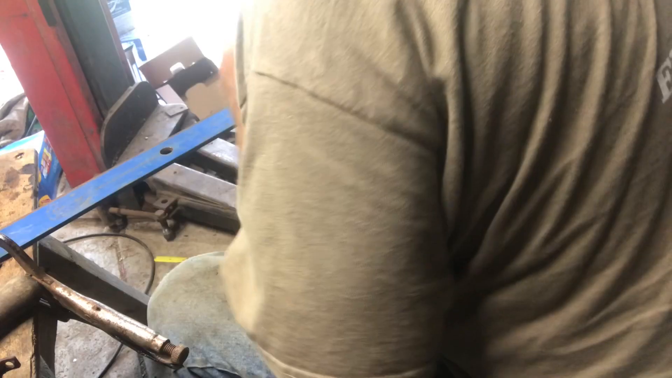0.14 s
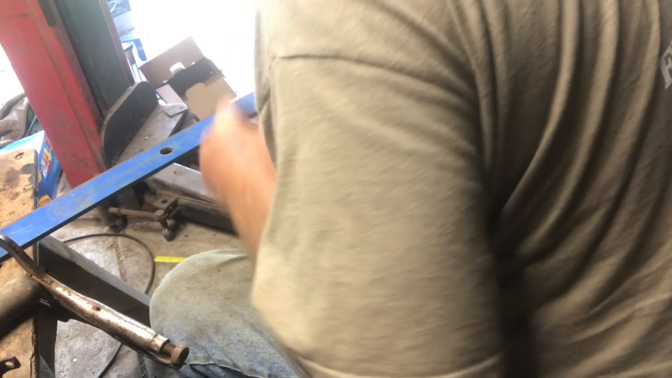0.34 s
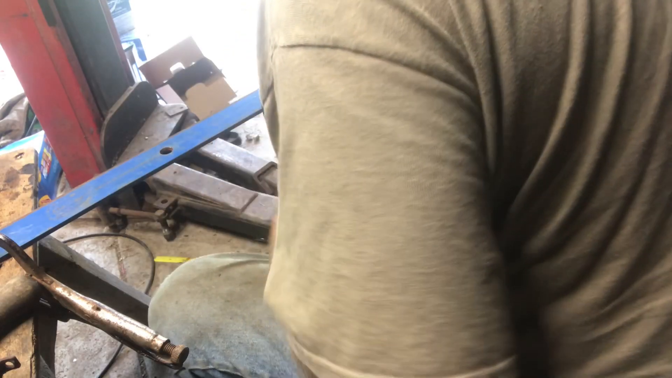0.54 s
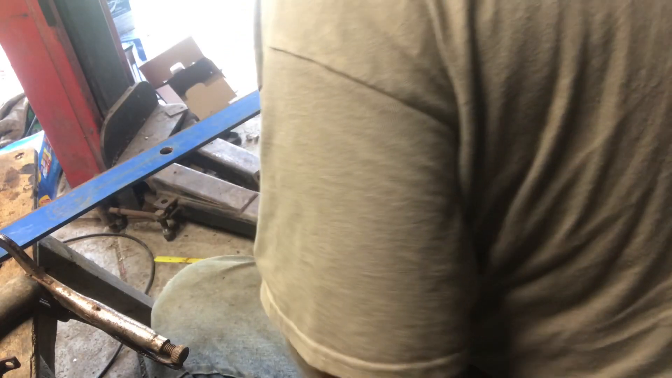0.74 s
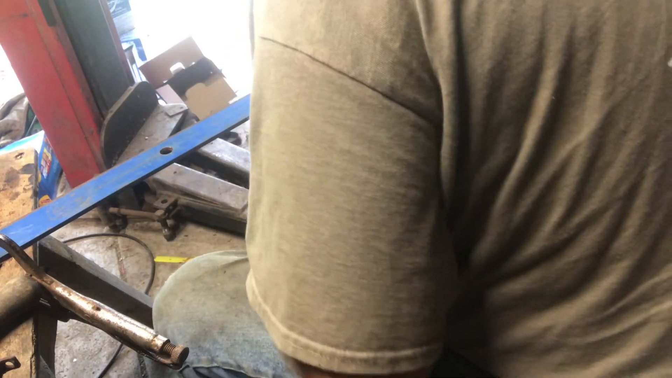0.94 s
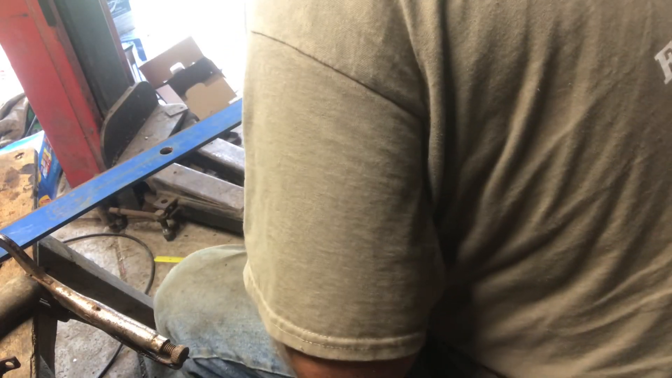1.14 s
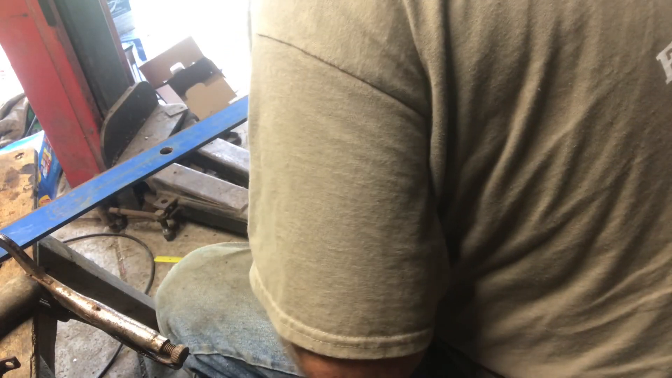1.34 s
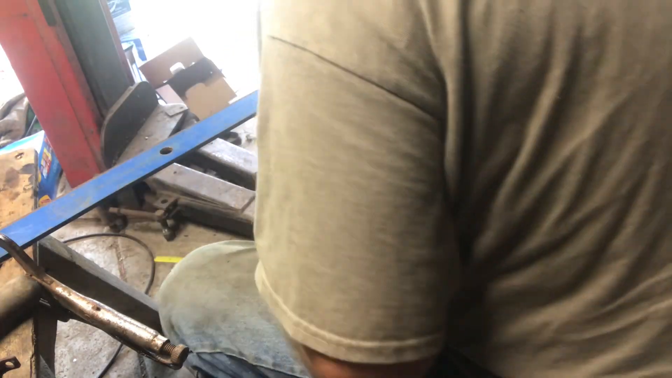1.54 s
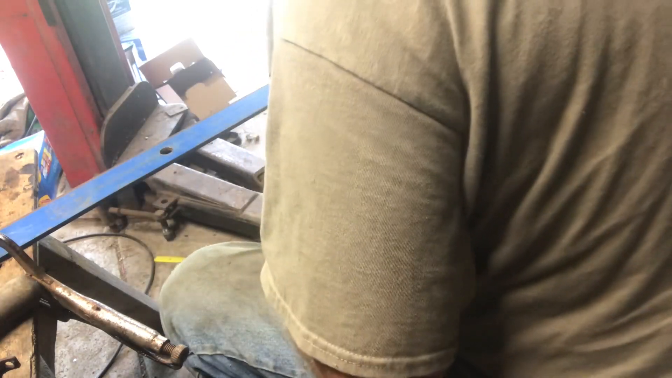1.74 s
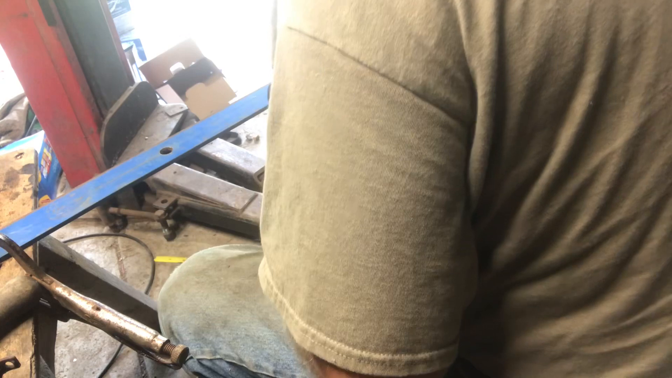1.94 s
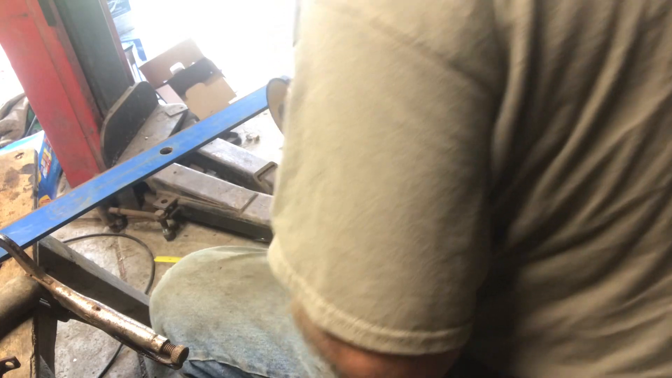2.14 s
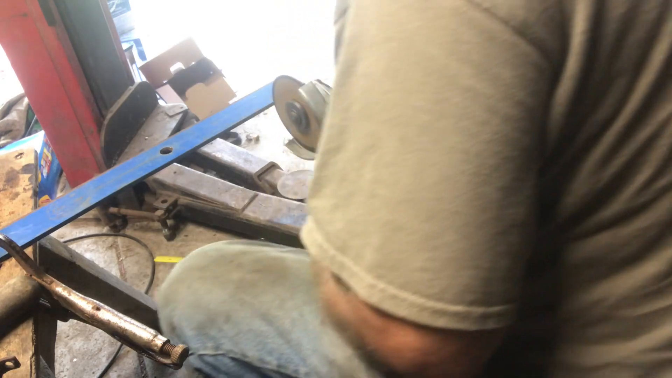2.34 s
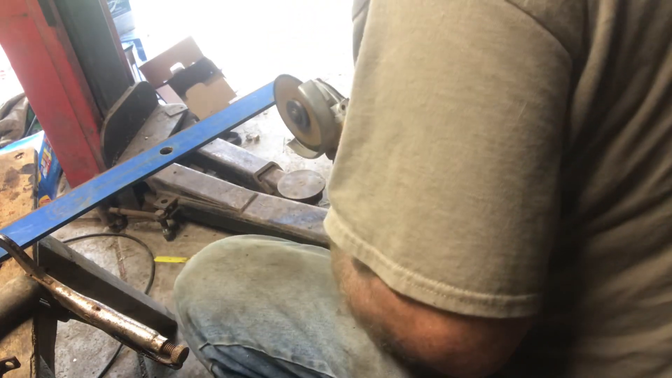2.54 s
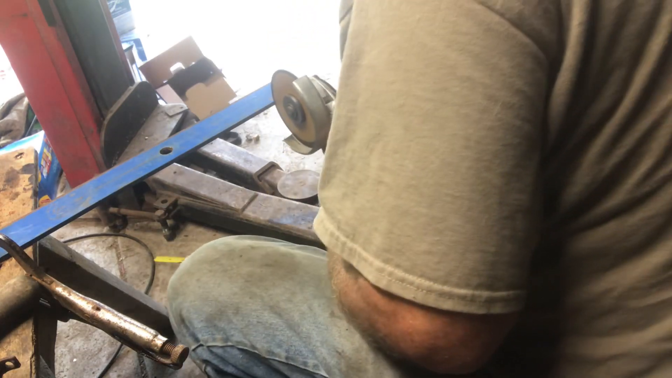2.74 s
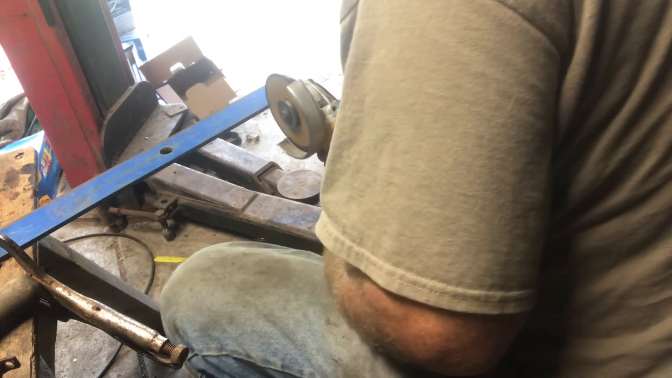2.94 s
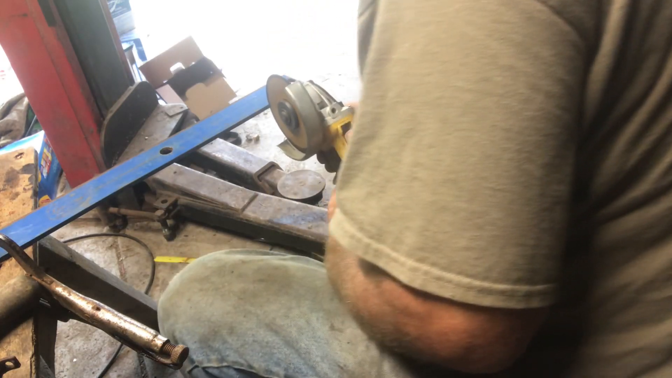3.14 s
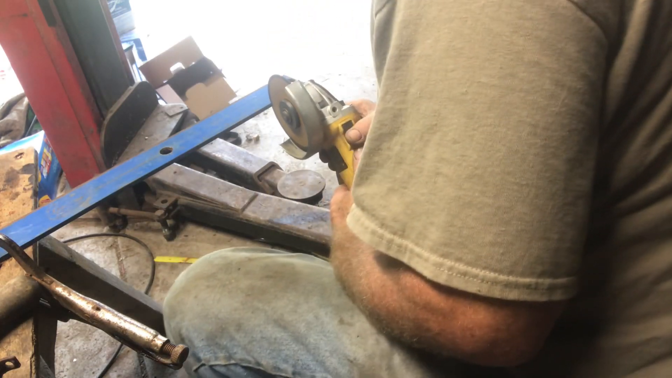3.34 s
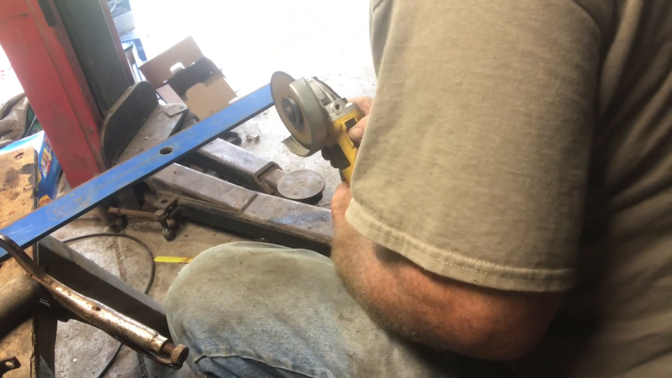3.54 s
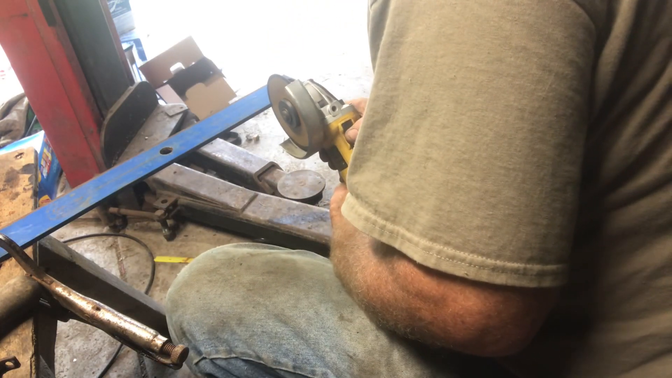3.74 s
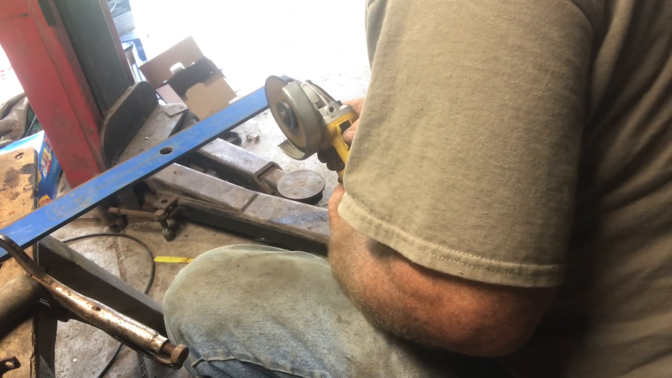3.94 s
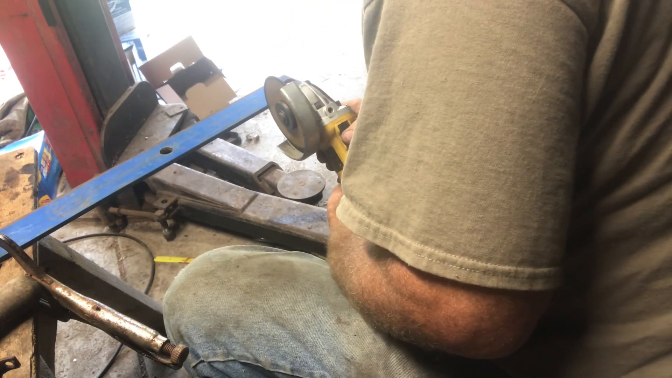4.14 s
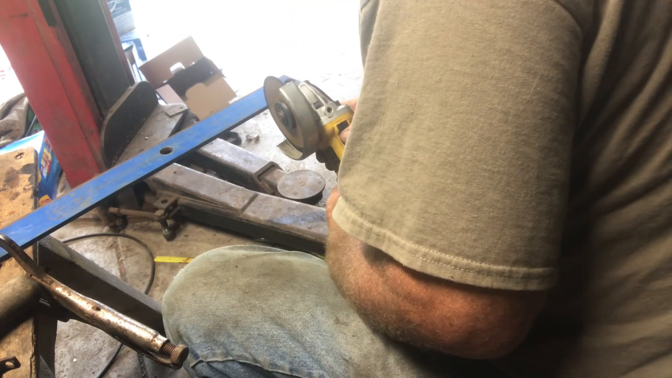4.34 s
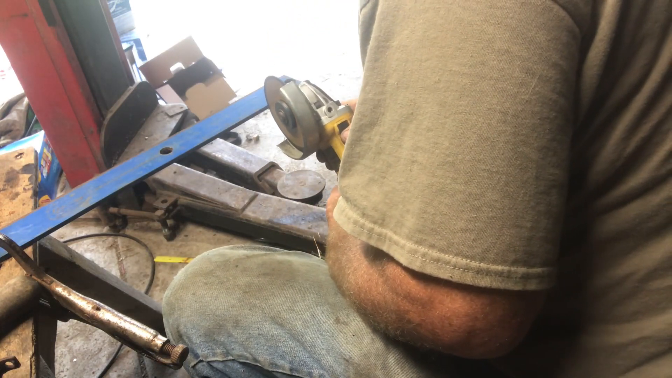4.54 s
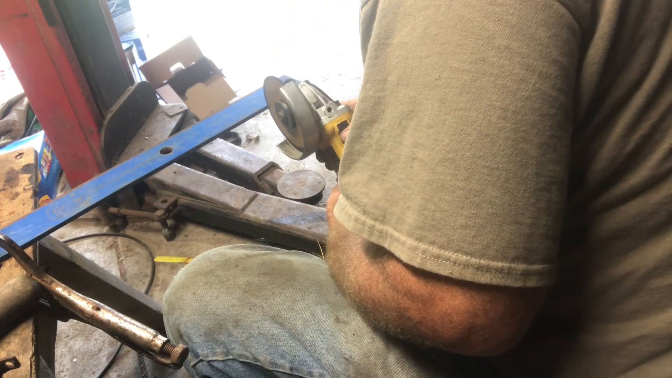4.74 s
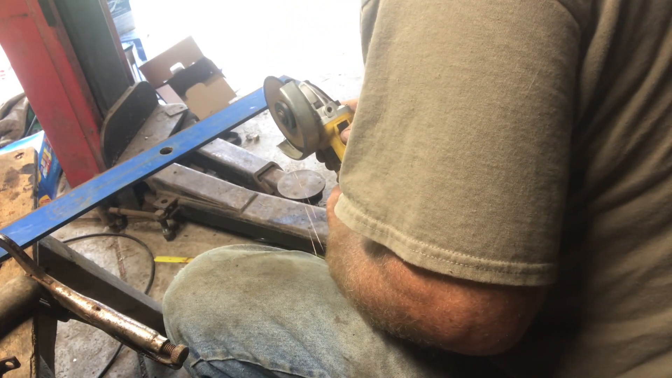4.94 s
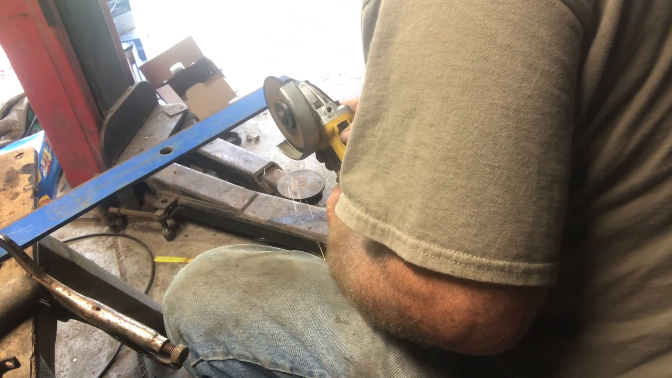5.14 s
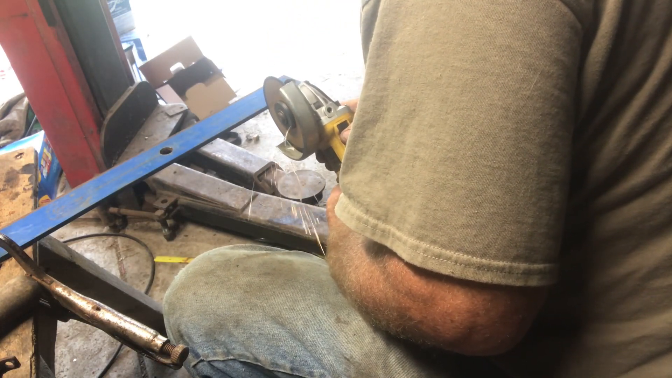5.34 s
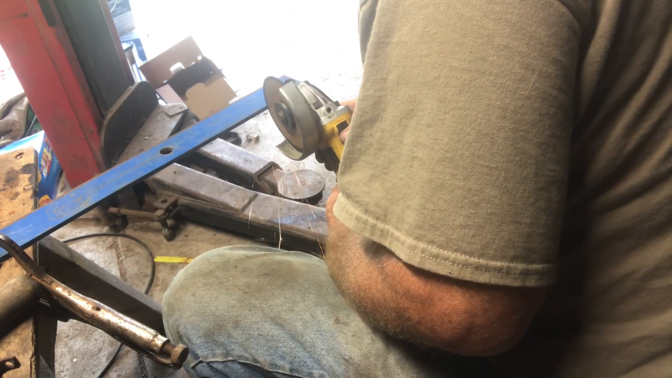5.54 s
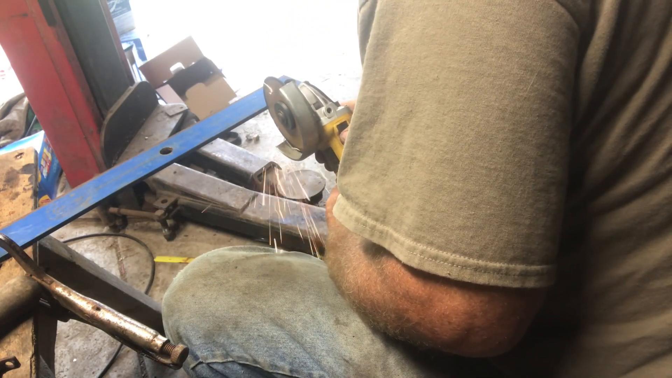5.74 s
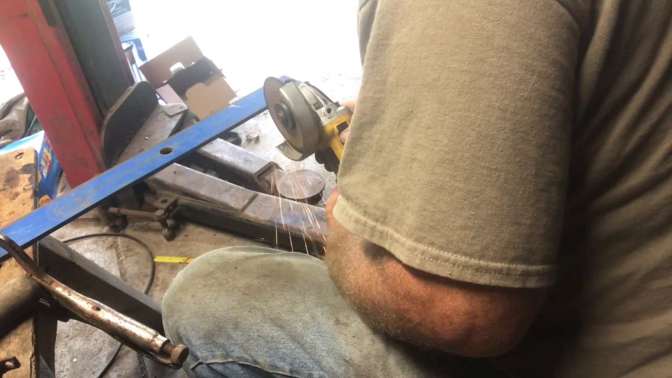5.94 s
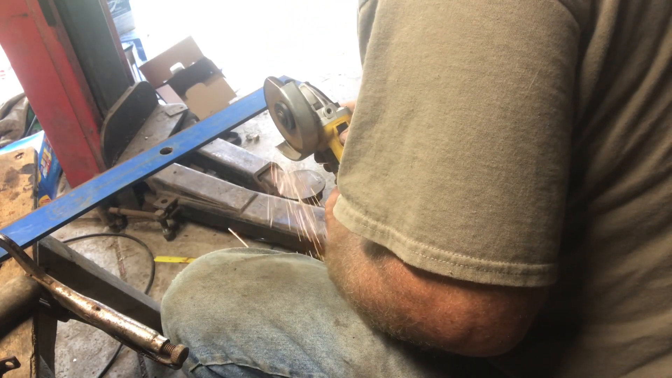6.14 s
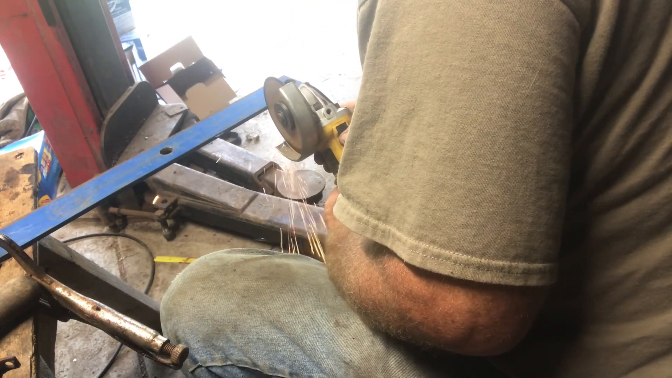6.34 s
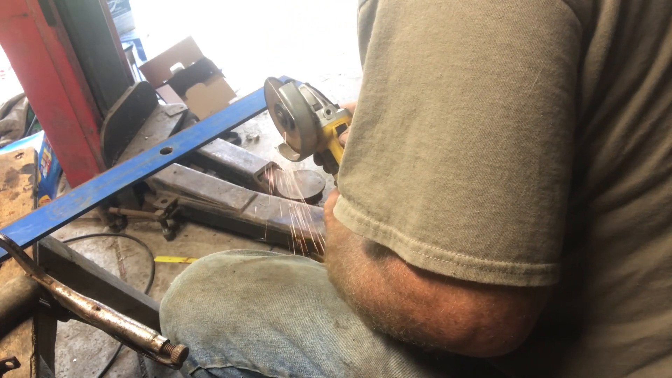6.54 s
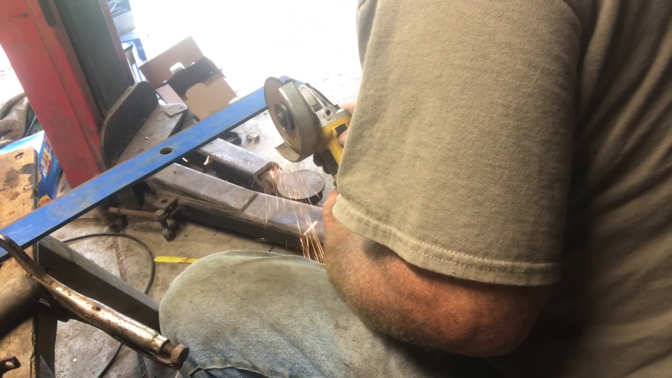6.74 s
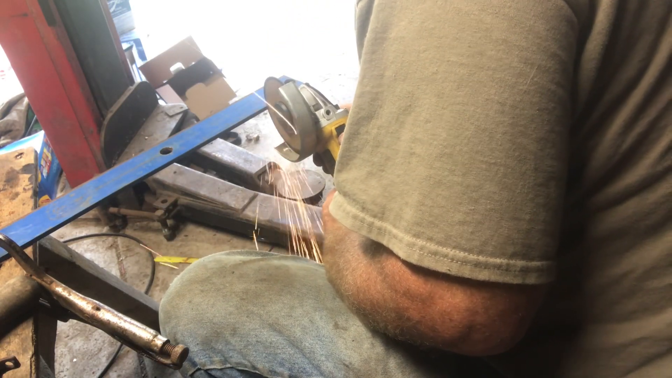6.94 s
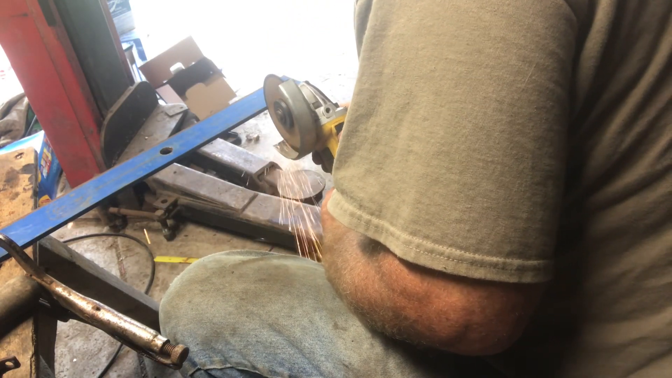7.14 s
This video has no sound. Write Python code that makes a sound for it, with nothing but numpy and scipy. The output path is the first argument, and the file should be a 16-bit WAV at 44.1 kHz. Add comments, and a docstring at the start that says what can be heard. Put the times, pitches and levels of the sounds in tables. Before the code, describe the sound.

In an open workshop a corded grinder rattles up to a steady whine, bounces on a steel bar, then cuts with a sagging, humming screech.

```python
"""First heard is a low outdoor wash with far rumble; it fades almost to silence and back, then a cricket trills.
A corded angle grinder is switched on in an open workshop, spins up and cuts a steel bar, slowing under load.
Filtered noise makes the gear rattle, fan hiss and scrape; sines locked to the disc's rotation make the shaft hums.
The rim scrapes much alike on every turn and excites the bar's modes. One microphone hears it all."""
import sys
import numpy as np
from scipy import signal
from scipy.fft import rfft, irfft, next_fast_len
from scipy.io import wavfile
from scipy.ndimage import uniform_filter1d, map_coordinates

SR = 44100
rng = np.random.default_rng(int(sys.argv[2]) if len(sys.argv) > 2 else 0)


def to_wav(s):
    """Save 16-bit WAV."""
    ch = np.atleast_2d(s).T  # columns
    pcm = np.round(np.clip(ch, -1, 1) * 32767)  # PCM
    wavfile.write(sys.argv[1], SR, pcm.astype(np.int16))


def gain_from_db(level_db):
    """Convert decibel levels to linear amplitude factors (20 dB per decade)."""
    decades = np.asarray(level_db, float) / 20
    return 10 ** decades


N = 317079
TIME = np.arange(N) / SR

# Broad noise spectra: far rumble, outdoor wash, wash before the fade; columns: pitch_hz, density_db [dB per Hz]
RUMBLE_SPECTRUM = [(15, -41), (25, -14), (43, -1.5), (70, -4), (102, -0.5), (141, -16.5), (220, -17),
                   (290, -48), (480, -120)]
WASH_SPECTRUM = [(110, -28), (180, -2), (434, -6), (1010, -4.5), (4860, -21.5), (5540, -22), (6310, -19),
                 (6930, -24), (7760, -25), (14400, -33), (15800, -44)]
EARLY_WASH_SPECTRUM = [(120, -33), (200, -3), (329, -5), (404, -11), (630, -5), (1250, -6), (2090, -19.5),
                       (12000, -36), (15600, -71), (22000, -120)]
# Gear growl, gear rattle, fan hiss, and gears clattering at low speed; columns: pitch_hz, density_db [dB per Hz]
GROWL_SPECTRUM = [(110, -29), (180, -21), (226, -21.5), (300, -14), (344, -14), (406, -4), (520, -2.5),
                  (575, -1), (1600, 1.5), (2080, -36), (3520, -120)]
RATTLE_SPECTRUM = [(820, -25.5), (1400, -11.5), (1560, -11), (1810, -3), (2150, -4.5), (2910, 1.5),
                   (3330, 0), (3870, -6), (4630, -13), (4980, -17), (5200, -15.5), (6760, -44),
                   (11400, -120)]
FAN_SPECTRUM = [(2820, -26), (4800, -1), (5040, -11), (5340, 0.5), (6150, 0), (6580, -4.5), (7110, 0),
                (7460, -7), (7800, -9.5), (9470, -8), (10400, -15), (13000, -14), (14900, -25),
                (15300, -32.5)]
CLATTER_SPECTRUM = [(120, -42), (270, -19), (320, -4.5), (495, -1), (786, -7), (960, -2), (1800, -2.5),
                    (3000, -1.5), (4300, -5), (4900, -21), (5800, -17), (7000, -15), (9600, -23),
                    (10500, -34), (14500, -37)]
# The cut's low body, ringing middle and high grit; columns: pitch_hz, density_db [dB per Hz]
BODY_SPECTRUM = [(41, -56), (70, -12), (119, -20), (155, -23), (215, -8.5), (278, -3.5), (326, -11),
                 (421, -7), (485, -12.5), (869, -9.5), (1020, -5), (1870, -17), (2100, -24), (2730, -48),
                 (4620, -120)]
RING_SPECTRUM = [(1180, -23), (2000, -22), (2160, -38), (2400, 1.5), (2620, 1.5), (3310, -6), (3580, -1),
                 (3770, -3.5), (4050, -16.5), (4520, -9), (5100, -32), (6630, -53), (11200, -120)]
GRIT_SPECTRUM = [(2880, -30), (4900, -3), (5100, -14), (5250, -4), (5840, -0.5), (6480, -6), (7220, -3),
                 (7840, -7.5), (9170, -2.5), (10300, -13.5), (11300, -5), (12300, -14), (15100, -11),
                 (15800, -29)]
# Narrow modes of the bar; columns: pitch_hz, width_hz, level_db [dB over the broad colour]
BAR_MODES = [(1030, 110, 3), (1184, 30, 0), (1265, 30, 0), (1847, 50, 3), (2706, 26, 1.5), (2870, 24, 0),
             (2994, 22, 0), (3145, 22, -1), (3246, 20, -1), (3492, 18, 5), (3648, 24, 0), (3803, 22, -2),
             (4400, 34, 1), (5370, 90, -1), (5993, 40, 4), (7133, 40, 0), (7270, 90, 0), (8270, 130, 0),
             (9232, 60, -1)]
# Modes of the gear head, guard and disc; columns: pitch_hz, width_hz, level_db [dB over the broad colour]
HEAD_MODES = [(1190, 70, -3), (1750, 50, -2), (1850, 60, -5), (2860, 90, -4), (3250, 50, -3),
              (3500, 80, -4), (5980, 45, 4), (6880, 100, -4), (7270, 90, 1)]
# Decay of the workshop's reverberation; columns: pitch_hz, t60_s
SHOP_DECAY = [(200, 0.38), (2000, 0.32), (10000, 0.45)]
# Switch, gear and casing ticks; columns: start_s, level_db [relative], brightness_db [edge over knock]
TICK_EVENTS = [(1.48, -21.5, -33), (1.8144, -18, -28), (1.9893, -15, -25), (2.0984, -21, -9),
               (2.102, -13, -16), (2.11, -18, -16)]
# How strongly the casing radiates disc orders 1, 2, 3, the armature tone and its whine; columns: pitch_hz, level_db
ORDER_1_RADIATION = [(60, -85), (97, -71), (112, -58), (140, -54), (155, -48), (163, -47), (170, -44),
                     (175, -48)]
ORDER_2_RADIATION = [(200, -68), (290, -66), (335, -65), (344, -56.5), (353, -50.5)]
ORDER_3_RADIATION = [(200, -74), (330, -58), (420, -54), (465, -47), (530, -44)]
ARMATURE_RADIATION = [(200, -66), (300, -61), (345, -48), (440, -43), (495, -39), (535, -44), (560, -50),
                      (590, -54), (599, -41), (605, -37), (616, -44), (628, -48)]
WHINE_RADIATION = [(7000, -70), (10000, -66), (11000, -58), (13000, -63), (14000, -57), (14500, -59),
                   (15100, -50), (15500, -55), (15700, -57)]
# How readily the bar hums, and how readily it sounds a shaft tone; columns: pitch_hz, level_db [relative]
HUM_RESPONSE = [(312, -8), (320, -5), (328, 3), (340, -4), (347, -1.5), (352, -1.5)]
LOADED_RESPONSE = [(562, -20.5), (590, -10), (620, -13), (635, -13.5), (675, -10.5), (700, -17),
                   (790, -16.5), (812, -11.5), (835, -28), (870, -20), (945, -20), (985, -14), (1030, -11),
                   (1060, -15)]
# High spots of the rim sing on orders of the disc; columns: order [cycles per turn], level_db [at 0 dB pressure]
RIM_ORDERS = [(16, -39), (17, -36), (22, -35), (25, -45), (27, -44)]
# Speed lost to the cut; columns: time_s, lost_hz [disc turns per second]
SPEED_LOSS = [(4.52, 0), (5.0, 2.5), (5.2, 4.7), (5.8, 11.7), (6.0, 13.2), (6.4, 17.3), (6.8, 17.7),
              (7.0, 19.5), (7.19, 20.1)]
# How hard the disc bears on the steel; it bounces twice before it bites; columns: time_s, pressure_db
PRESSURE = [(4.5, -19), (4.6, -8), (4.75, -0.5), (4.83, -10.5), (4.92, -1.5), (4.99, -9), (5.05, -1),
            (5.29, -3.5), (5.46, -0.4), (5.96, -1.5), (6.14, 0.4), (6.74, -0.8), (7.09, 2), (7.19, 1.8)]
# Deep in the slot the hum comes in bursts; columns: centre_s, rise_db
HUM_BURSTS = [(6.27, 4.5), (6.51, 7), (6.69, 9), (6.85, 7), (7.12, 6.5)]
# Growth of each noise of the free tool with speed; columns: rest_db, full_speed_db, power [of the speed]
GROWL_GROWTH = (-43, -35.5, 1.3)
RATTLE_GROWTH = (-35, -25.5, 1.9)
FAN_GROWTH = (-52.5, -36.5, 1)

# Levels below are relative, ahead of the mix and the microphone's gain.
CROSS_S, FADE_OUT_S, FADE_IN_S = 0.139, 0.027, 0.034  # instant and slopes of the brief fade out and in
EARLY_RUMBLE_DB, TRAFFIC_DB, EARLY_WASH_DB, WASH_DB = -51.5, -63.5, -59.5, -67
PASS_S, PASS_DB, PASS_WIDTH_S = .62, 3, 0.088  # the wash swells once
SHAKE_DB, SHAKE_CUT_DB = -64.5, 10  # low shaking of the running tool; extra in a deep cut
STROKE_HZ = 37.45  # cricket wing strokes
GEARING, SLOTS = 3.554, 25  # armature turns per disc turn; whine cycles per armature turn
FREE_HZ = 176.76  # disc speed without load
SWITCH_S, KICK_HZ = 1.47, 26  # the switch closes; speed after the first jerk
QUICK_S, SLOW_S, QUICK_SHARE = .1314, .506, .499  # the speed still to gain dies away in two parts
GRAB_S, SLACK_DB = .009, -7  # the gears take up their play this long after the switch; weaker till then
SURGE_S, SURGE_DB, SURGE_RISE_S, SURGE_FALL_S = 1.8, 2, 0.016, 0.066  # the noise swells once on the way up
RING_DB, GRIT_DB, BODY_DB, STRAIN_DB, HUM_DB = -23, -31, -30, -28.5, -24.5  # the cut's layers at 0 dB pressure
GRIT_DULLS_DB, DEEP = 45, .09  # hiss lost per unit share of slowing; share of slowing at which the slot is deep
HUM_LAG_S, BURST_WIDTH_S = .035, 0.037  # the bar's hum follows the pressure; width of its bursts
TOP_HZ = 15760  # the microphone's upper limit


def unit(x):
    """Normalisation: the signal is scaled to rms 1."""
    return x / np.sqrt(np.mean(x ** 2) + 1e-20)


def along(points, hz):
    """Interpolation of a spectrum along a logarithmic frequency axis."""
    f, v = np.transpose(points)
    return np.interp(np.log(hz + 1), np.log(f + 1), v)


def curve(rows, before=None):
    """Linear interpolation of a time history, one value per sample."""
    time_s, value = np.transpose(rows)
    return np.interp(TIME, time_s, value, left=before)


def wobble(rate):
    """Random fluctuation: a smooth curve through `rate` random knots a second."""
    return map_coordinates(rng.standard_normal(int(N * rate / SR) + 4), [TIME * rate])


def filtered(x, response):
    """Linear filtering: the spectrum is multiplied by a function of frequency."""
    m = next_fast_len(x.shape[-1] + SR // 4)
    return irfft(rfft(x, m) * response(np.fft.rfftfreq(m, 1 / SR)), m)[..., :x.shape[-1]]


def resonance(f, hz, width):
    """Simple resonator: response of one damped mode, 1 at its centre."""
    return 1j * f * width / (hz * hz - f * f + 1j * f * width)


def coloured(x, spectrum, modes=()):
    """Modal radiation: a broad spectrum with narrow resonances, at rms 1."""
    def response(f):
        peaks = 1 + sum(gain_from_db(db) * resonance(f, hz, width) for hz, width, db in modes)
        return gain_from_db(along(spectrum, f)) * peaks
    return unit(filtered(x, response))


def rotor(turns, memory, grain_db, beat, size=256):
    """Cyclic contact noise: each turn keeps a share of the last; grains vary in size, one side bears harder."""
    shape = int(turns[-1]) + 2, size
    fresh = rng.standard_normal(shape) * gain_from_db(grain_db * rng.standard_normal(shape))
    kept = signal.lfilter([1], [1, -np.clip(memory, 0, .95)], fresh, axis=0)
    return map_coordinates(kept.ravel(), [turns * size]) * (1 + beat * np.cos(2 * np.pi * turns))


def tone(turns, db, flutter_db, rate):
    """Shaft order: a sine locked to rotation, of unsteady strength."""
    return gain_from_db(db + flutter_db * wobble(rate)) * np.sqrt(2) * np.sin(2 * np.pi * (turns + rng.random()))


def load():
    """Cutting load: gain of the pressure, share of speed lost, and depth of the slot (0-1)."""
    sag = curve(SPEED_LOSS) / FREE_HZ
    return gain_from_db(curve(PRESSURE, before=-120)), sag, np.clip(sag / DEEP, 0, 1)


def speed():
    """Rotor inertia: disc turns a second run up in two exponential stages, less what the cut takes."""
    t = np.maximum(TIME - SWITCH_S, 0)
    to_gain = QUICK_SHARE * np.exp(-t / QUICK_S) + (1 - QUICK_SHARE) * np.exp(-t / SLOW_S)
    lost_hz = uniform_filter1d(curve(SPEED_LOSS), SR // 24)  # the rotor's inertia rounds every change
    return (FREE_HZ - (FREE_HZ - KICK_HZ) * to_gain - lost_hz) * (TIME > SWITCH_S)


def yard(speed_hz):
    """Distant broadband noise: traffic rumble and wash, fuller before the fade; the tool shakes the floor."""
    rumble, wash, early_wash = rng.standard_normal((3, N))
    early = TIME < CROSS_S
    shake = gain_from_db(SHAKE_DB + SHAKE_CUT_DB * load()[2]) * speed_hz / FREE_HZ
    traffic = gain_from_db(TRAFFIC_DB + 1.1 * wobble(2.2))
    low = np.where(early, gain_from_db(EARLY_RUMBLE_DB), np.hypot(traffic, shake))
    swell_db = PASS_DB * np.exp(-((TIME - PASS_S) / PASS_WIDTH_S) ** 2)
    before = gain_from_db(EARLY_WASH_DB) * coloured(early_wash, EARLY_WASH_SPECTRUM)
    after = gain_from_db(WASH_DB + swell_db) * coloured(wash, WASH_SPECTRUM)
    return low * coloured(rumble, RUMBLE_SPECTRUM) + np.where(early, before, after)


def cricket():
    """Stridulation: wing strokes, rippled at four times their rate, ring a high mode; a lower rasp returns."""
    stroke = STROKE_HZ * TIME + 0.53 + .02 * wobble(8)

    def gate(lag, lift):
        return np.maximum(np.cos(2 * np.pi * (stroke - lag)) + lift, 0) ** .6

    def band(hz, width):
        return unit(filtered(rng.standard_normal(N), lambda f: 1 / (1 + ((f - hz) / width) ** 2)))

    teeth = 1 + .3 * np.cos(2 * np.pi * 4 * stroke)
    mode = 0.78 * band(6530, 90) + np.sin(2 * np.pi * 6503 * TIME)
    song = unit(gate(0, .3) * teeth * mode)
    rasp = unit(gate(0.4, .4) * band(6200, 220))
    return (gain_from_db(-76 + .8 * wobble(12)) * song + gain_from_db(-80.5) * rasp) * (TIME > CROSS_S)


def ticks():
    """Impact excitation: short cracks, a dull knock of the casing with a bright edge."""
    out, t = np.zeros(N), np.arange(SR // 20) / SR
    for start_s, level_db, bright_db in TICK_EVENTS:
        dull, bright = rng.standard_normal((2, len(t)))
        for _ in range(2):
            dull = filtered(dull, lambda f: resonance(f, 2100, 2100))
        knock = unit(dull) * gain_from_db(-60 * t / 0.025)
        edge = unit(filtered(bright, lambda f: resonance(f, 9500, 5000))) * gain_from_db(bright_db - 60 * t / 0.019)
        out[round(start_s * SR):][:len(t)] += gain_from_db(level_db - 7.5) * (knock + edge)
    return out


def idle_db(law, speed_hz):
    """Power law of speed: level of one noise of the free tool; the cut leaves it as it is."""
    rest_db, full_db, power = law
    free = np.clip(speed_hz / FREE_HZ + load()[1], 0, 1)
    late = TIME - SURGE_S
    surge = np.exp(-np.abs(late) / np.where(late < 0, SURGE_RISE_S, SURGE_FALL_S))
    level_db = rest_db + (full_db - rest_db) * free ** power
    level_db = level_db + SURGE_DB * surge + SLACK_DB * (TIME < SWITCH_S + GRAB_S)
    return np.where(speed_hz > 0, level_db, -120)


def motor(speed_hz, turns):
    """Gear contact and turbulent flow: growl, rattle rippling at twice the mains rate, hiss brighter with speed."""
    growl_db = idle_db(GROWL_GROWTH, speed_hz)
    rattle_db = idle_db(RATTLE_GROWTH, speed_hz)
    fan_db = idle_db(FAN_GROWTH, speed_hz)
    grains = rng.standard_normal(N) * gain_from_db(1.04 * wobble(700) + 0.32 * wobble(40) + 0.12 * wobble(7))
    mesh = unit(grains) + 0.26 * unit(rotor(turns, memory=.7, grain_db=3.5, beat=0.18))
    mesh = mesh * (1 + 0.037 * np.cos(2 * np.pi * 120 * TIME))  # torque ripple
    flow = rng.standard_normal(N) * gain_from_db(1.9 * wobble(500) + 0.74 * wobble(30))
    air = coloured(flow + 0.44 * unit(mesh), FAN_SPECTRUM, HEAD_MODES)
    top = filtered(air, lambda f: 1 / (1 + (9800 / (f + 1)) ** 12))
    air = air - top * (1 - (speed_hz / FREE_HZ) ** 3.3)
    running = gain_from_db(growl_db) * coloured(mesh, GROWL_SPECTRUM, HEAD_MODES)
    running += gain_from_db(rattle_db) * coloured(mesh, RATTLE_SPECTRUM, HEAD_MODES)
    running += gain_from_db(fan_db) * air
    slack = np.clip((170 - speed_hz) / 75, 0, 1)  # below speed the gears clatter loosely
    loose = rng.standard_normal(N) * gain_from_db(2.2 * wobble(600))
    clatter = gain_from_db(rattle_db + 1) * coloured(loose, CLATTER_SPECTRUM, HEAD_MODES)
    return np.sqrt(1 - slack) * running + np.sqrt(slack) * clatter


def shafts(speed_hz, turns):
    """Forced vibration: orders of disc and armature; under load the bar hums at two blows a turn, with overtones."""
    press, sag, depth = load()

    def order(k, response, flutter_db, rate):
        return tone(k * turns, along(response, k * speed_hz), flutter_db, rate)

    idle = order(1, ORDER_1_RADIATION, 0.19, 14) + order(2, ORDER_2_RADIATION, 1.0, 13)
    idle += order(3, ORDER_3_RADIATION, 0.96, 15) * (1 + .7 * depth)
    idle += order(GEARING, ARMATURE_RADIATION, 1.6, 12)
    shiver = .12 * wobble(150)  # cycles of phase unrest
    whine_order = SLOTS * GEARING
    whine = tone(whine_order * turns + shiver, along(WHINE_RADIATION, whine_order * speed_hz), 2.2, 24.76)
    whine = whine / (1 + 1.5 * depth ** 2)

    # the bar's own low mode beats with the hum
    wander = .48 * unit(filtered(rng.standard_normal(N), lambda f: 1 / (1 + ((f - 350) / 22) ** 2)))
    bursts_db = sum(db * np.exp(-((TIME - s) / BURST_WIDTH_S) ** 2) for s, db in HUM_BURSTS)
    unsteady_db = bursts_db + 1.25 * depth * wobble(18)
    hum_gain = np.interp(TIME - HUM_LAG_S, TIME, press) ** 0.95 * np.clip(depth / 0.11, 0, 1) ** 0.54
    hum_gain = hum_gain * gain_from_db(HUM_DB + along(HUM_RESPONSE, 2 * speed_hz) + unsteady_db)
    hum = hum_gain * (tone(2 * turns, -1.25, 0.77, 30) + wander * np.clip(9 * sag, 0, 1))

    strain = gain_from_db(STRAIN_DB) * press ** 0.15 * depth ** 0.34
    overtones = sum(order(k, LOADED_RESPONSE, 2, 8) for k in (GEARING, 4, 5, 6))
    return (idle + whine) * (speed_hz > 0) + hum + strain * overtones


def rim_tones(turns):
    """Periodic contact: the rim's high spots sing unsteady orders while it bears on the steel."""
    press, _, depth = load()
    tones = sum(tone(k * turns + .06 * wobble(60), db, 2.5, 6) for k, db in RIM_ORDERS)
    return press * depth ** .3 * tones


def cut(turns):
    """Friction excites the bar's modes: a light touch repeats each turn, a deep cut tears fresh grit."""
    press, sag, depth = load()
    chatter = gain_from_db(0.61 * wobble(35) + 0.75 * wobble(120))  # the hand-held disc bounces in the slot

    def scrape(memory, fresh):
        repeated = unit(rotor(turns, memory, grain_db=3, beat=0.47))
        torn = fresh * rng.standard_normal(N) * gain_from_db(3.6 * wobble(600))
        return chatter * (repeated + torn) / np.hypot(1, fresh)

    body = coloured(scrape(0.67, 2.0), BODY_SPECTRUM, BAR_MODES)
    ring = coloured(scrape(0.81, 1.2 + 3 * sag), RING_SPECTRUM, BAR_MODES)
    grit = coloured(scrape(0.92, 0.46 + 22 * sag), GRIT_SPECTRUM, BAR_MODES)
    out = gain_from_db(BODY_DB) * press ** .3 * depth ** .7 * body
    return out + gain_from_db(RING_DB) * press * ring + gain_from_db(GRIT_DB - GRIT_DULLS_DB * sag) * press * grit


def shop(x):
    """Reverberation: each frequency of the workshop's diffuse answer decays at its own speed."""
    hz, t, z = signal.stft(rng.standard_normal(SR // 2), SR, nperseg=256)
    tail = signal.istft(z * gain_from_db(-60 * t / along(SHOP_DECAY, hz)[:, None]), SR, nperseg=256)[1]
    delayed = np.pad(x, (300, 0))  # samples before the first reflections
    return signal.fftconvolve(delayed, tail / np.linalg.norm(tail))[:N]


def scene():
    """Superposition: tool and cut share one rotation; the room blurs the noises, steady tones arrive direct."""
    speed_hz = speed()
    turns = np.cumsum(speed_hz) / SR
    tool = motor(speed_hz, turns) + cut(turns) + rim_tones(turns) + ticks()
    mono = gain_from_db(-1) * tool + gain_from_db(-11.5) * shop(tool)
    mono = mono + shafts(speed_hz, turns) + cricket() + yard(speed_hz)
    return np.array([mono, mono])


def band_limit(x):
    """A steep low-pass at the top of the band."""
    return signal.sosfilt(signal.butter(12, 17000, fs=SR, output="sos"), x)


def record(dry):
    """Band limiting: one microphone, deaf to deepest bass and top treble, feeds both channels; one brief fade."""
    heard = filtered(dry, lambda f: (f < TOP_HZ) / (1 + (48 / (f + 1)) ** 4)) * gain_from_db(1.0)
    fade = np.maximum((CROSS_S - TIME) / FADE_OUT_S, (TIME - CROSS_S) / FADE_IN_S)
    return band_limit(heard * np.clip(fade, .03, 1))


dry = scene()
out = record(dry)
to_wav(out)
```